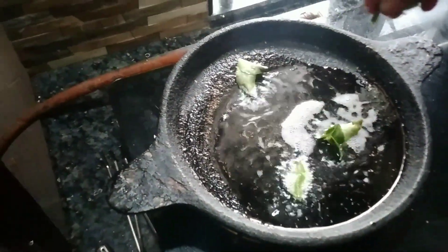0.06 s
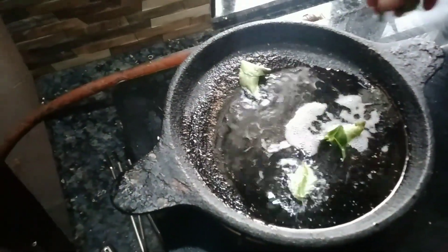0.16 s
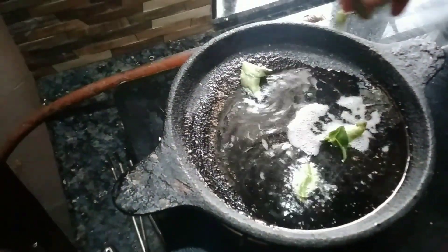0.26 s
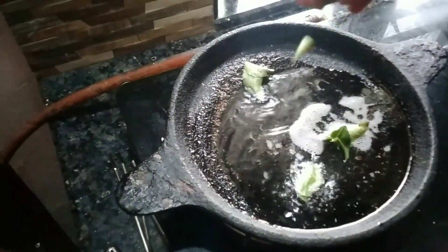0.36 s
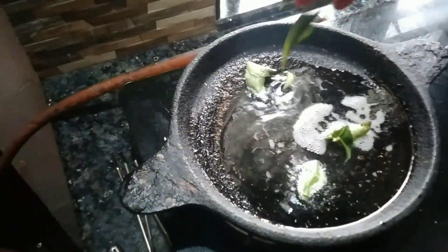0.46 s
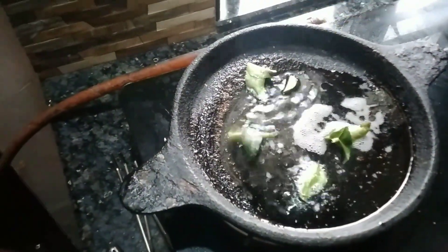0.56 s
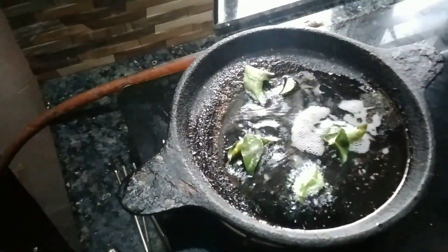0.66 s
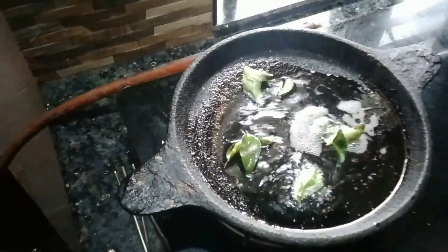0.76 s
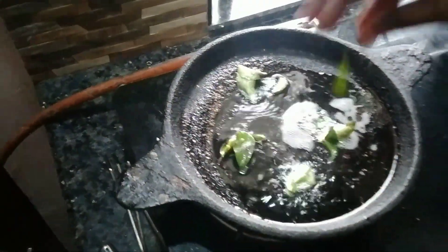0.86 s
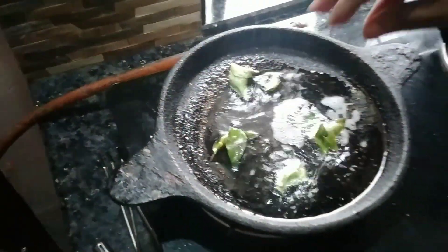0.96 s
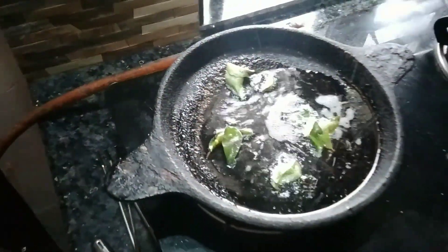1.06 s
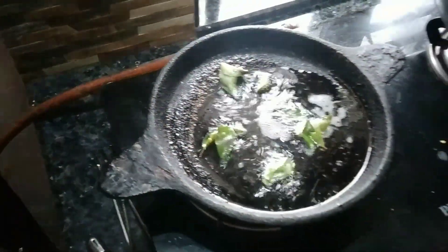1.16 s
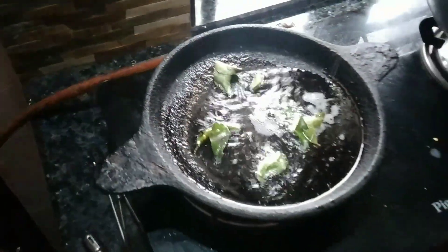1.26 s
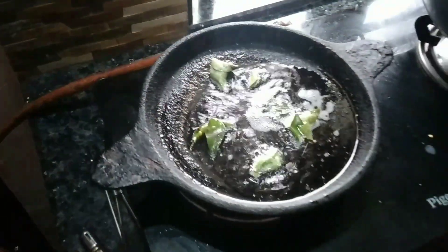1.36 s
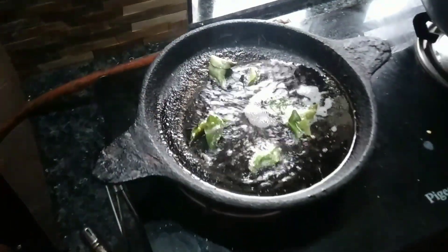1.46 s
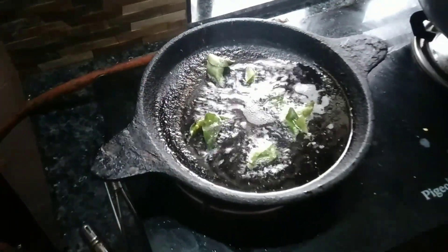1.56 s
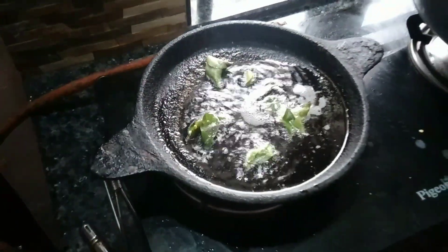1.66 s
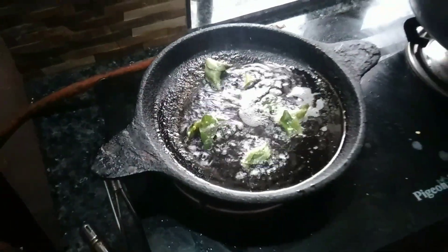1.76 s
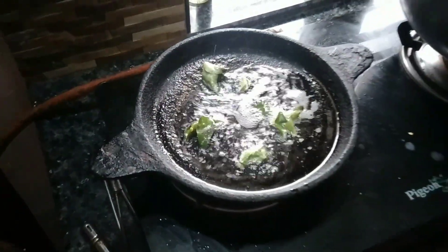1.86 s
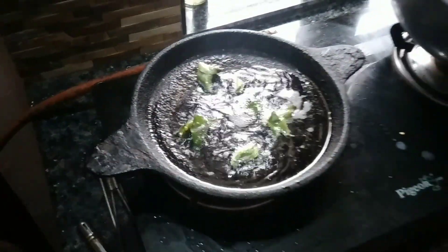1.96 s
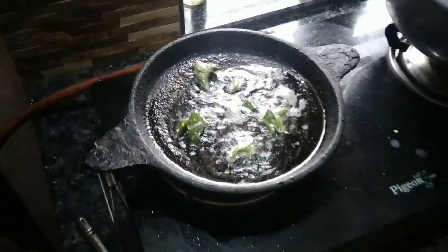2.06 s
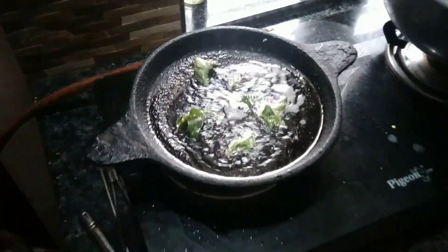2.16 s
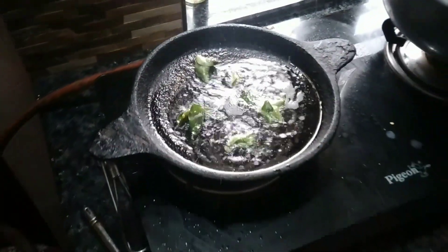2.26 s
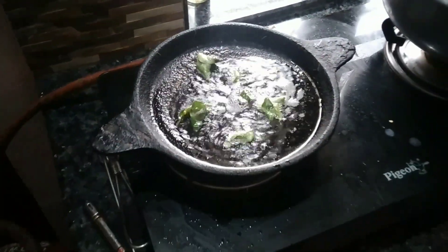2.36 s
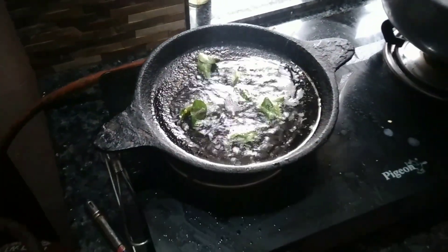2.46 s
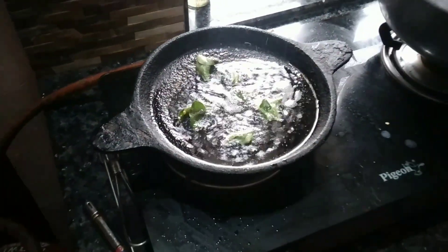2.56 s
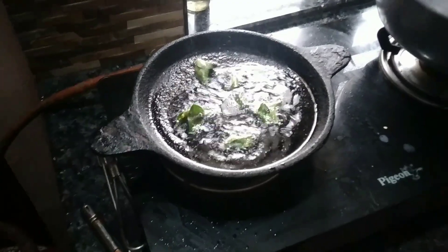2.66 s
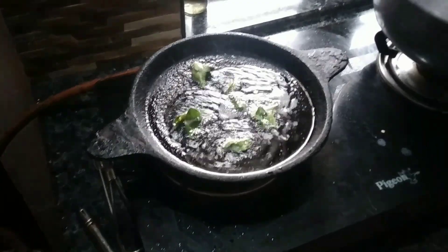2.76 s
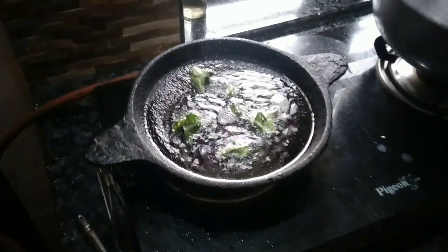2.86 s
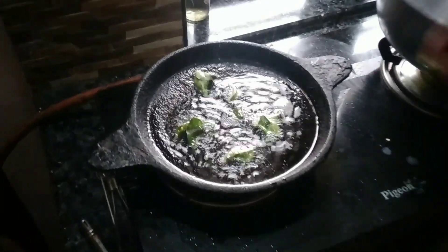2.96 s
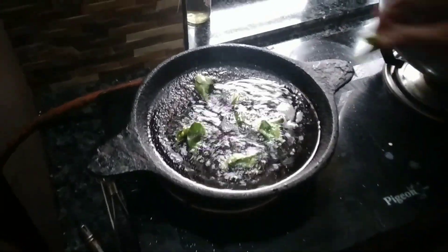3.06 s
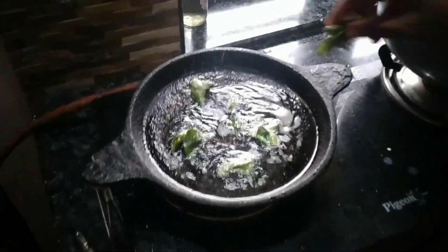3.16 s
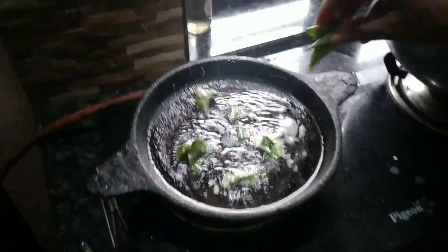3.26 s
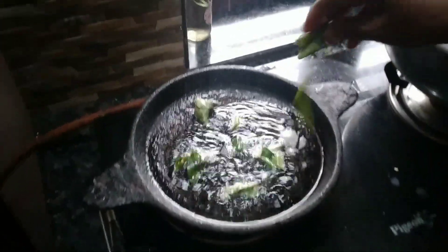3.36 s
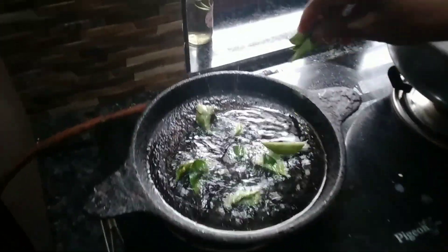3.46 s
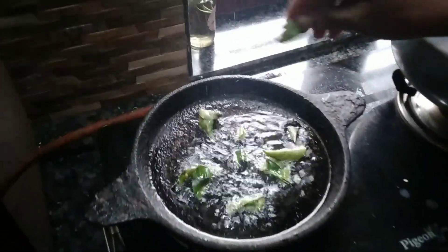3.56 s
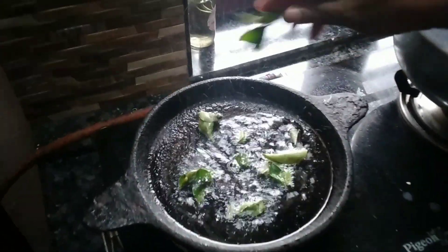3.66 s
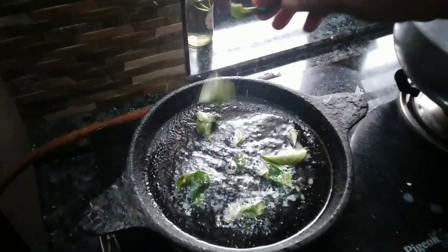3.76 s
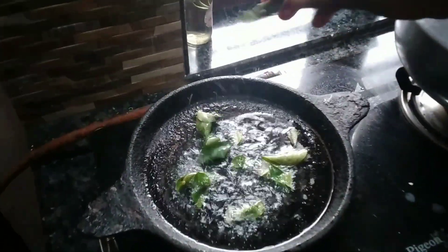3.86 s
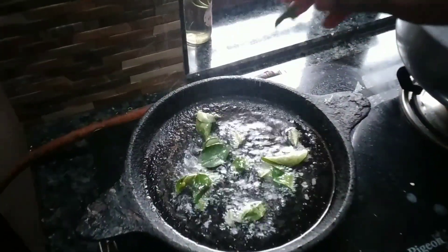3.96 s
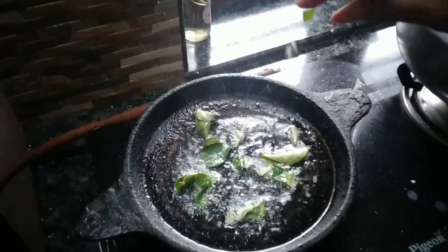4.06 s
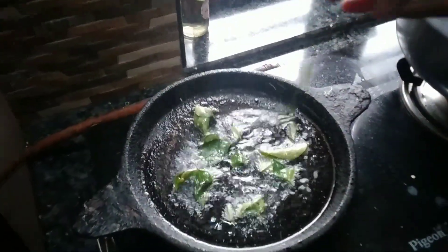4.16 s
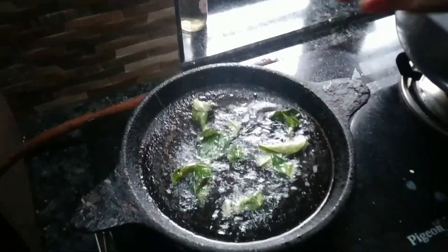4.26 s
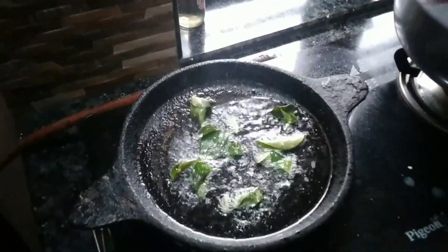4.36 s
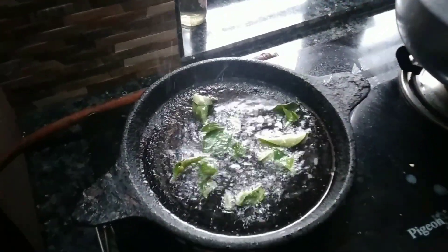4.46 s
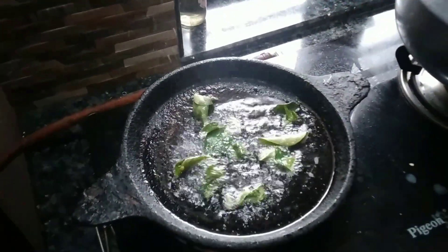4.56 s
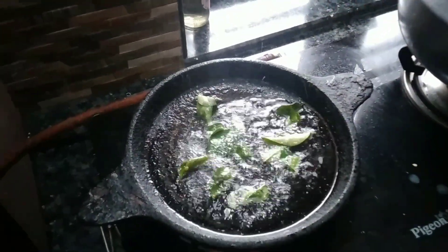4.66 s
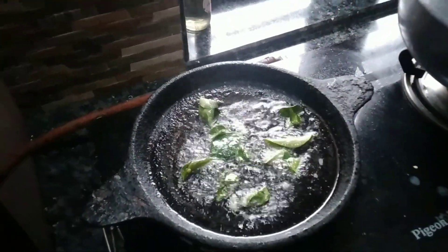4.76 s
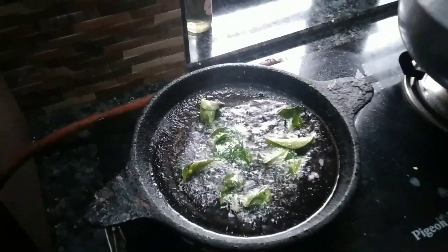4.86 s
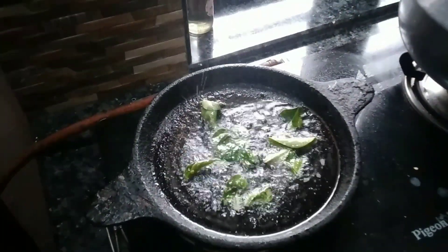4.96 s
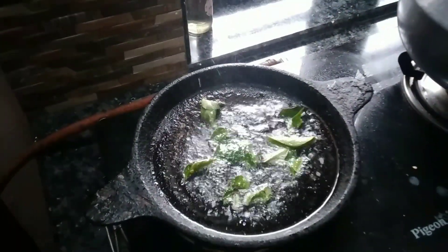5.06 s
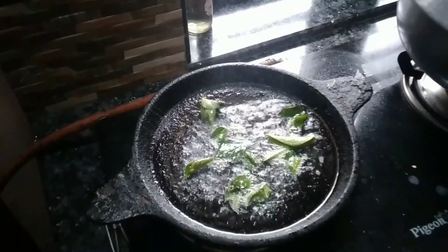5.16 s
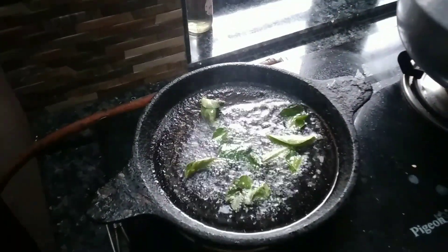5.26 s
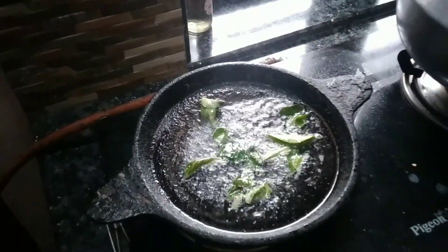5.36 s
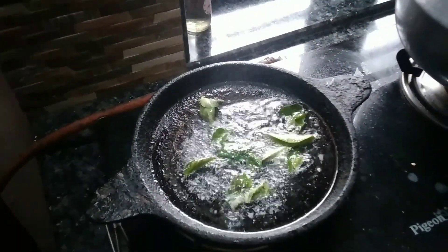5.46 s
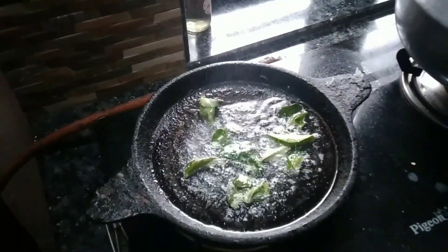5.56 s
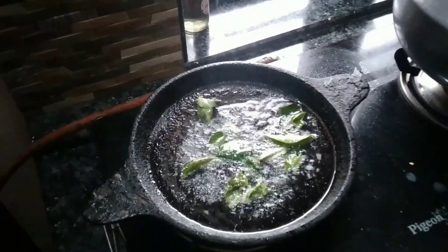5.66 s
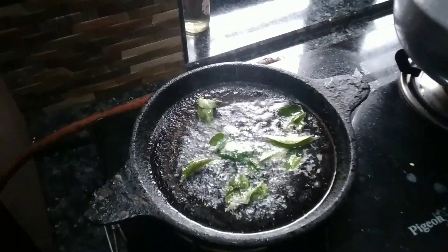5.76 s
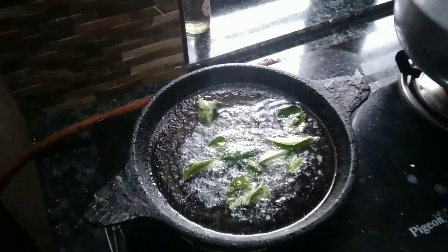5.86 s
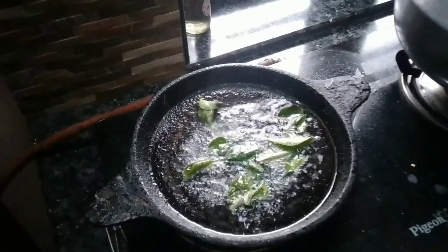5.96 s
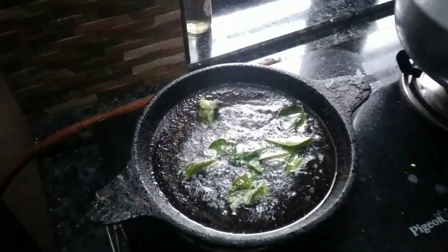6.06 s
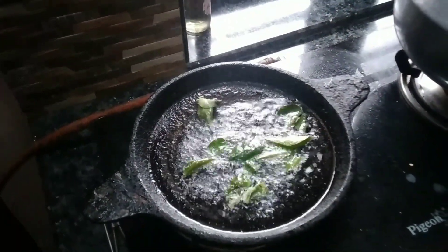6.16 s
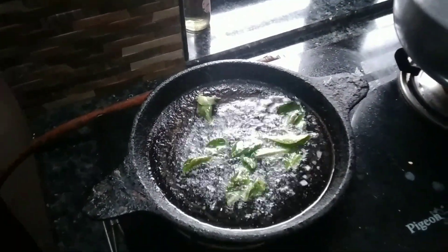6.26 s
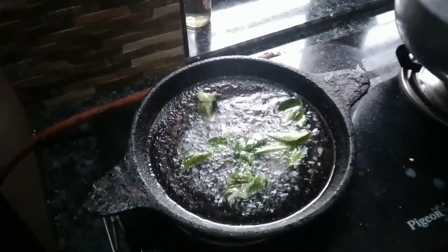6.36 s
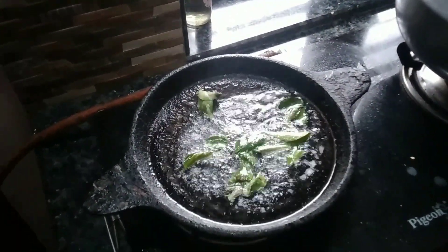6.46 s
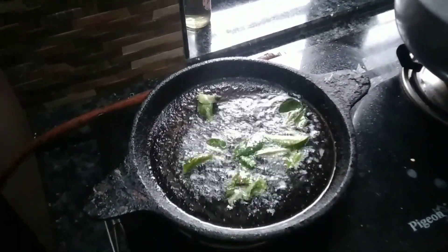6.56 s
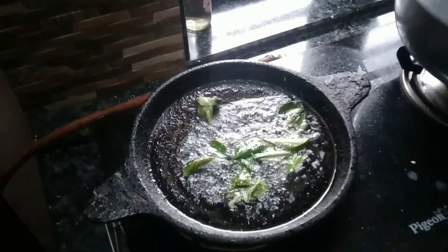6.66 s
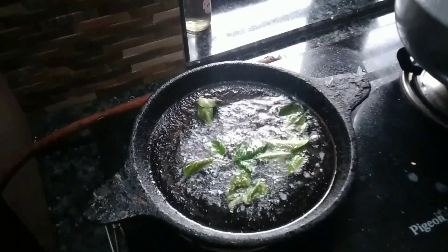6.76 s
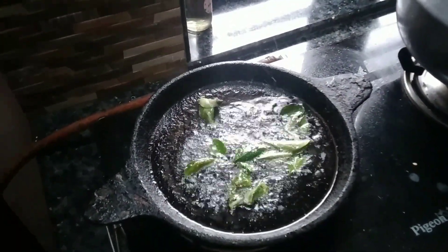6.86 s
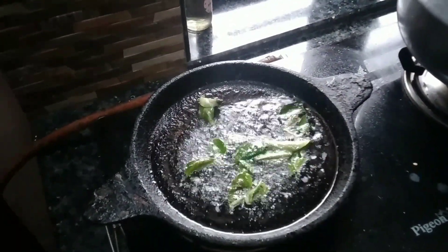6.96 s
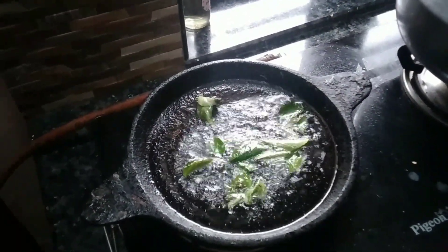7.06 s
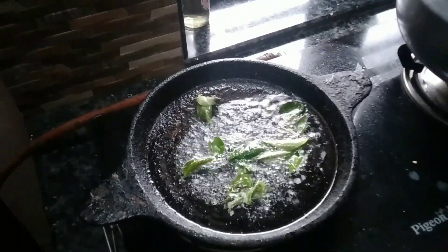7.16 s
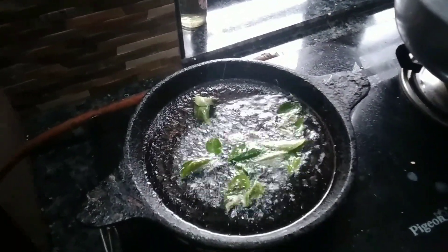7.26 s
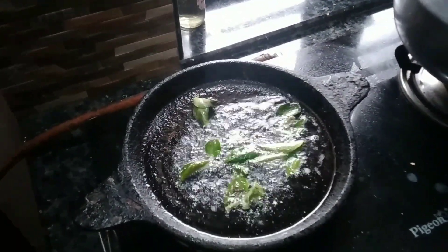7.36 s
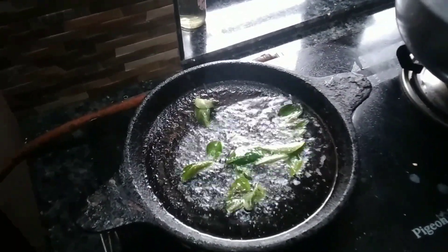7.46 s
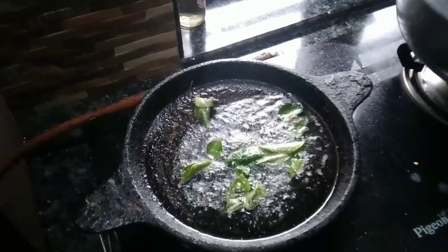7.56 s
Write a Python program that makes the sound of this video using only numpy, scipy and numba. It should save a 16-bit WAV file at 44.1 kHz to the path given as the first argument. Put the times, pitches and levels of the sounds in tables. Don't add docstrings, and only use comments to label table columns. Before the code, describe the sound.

Wet leaves fry in an iron pan of hot oil, close to a stereo microphone in a small, slightly echoing kitchen. From 0 to 0.5 s the fizz is thin, with quick sharp spits over faint low room noise. A cluster of hollow pops comes at 0.5-0.7 s, then the sizzle rises in clumps from about 0.9 s. Soft dull knocks begin near 1.5 s and recur at 2.4 and 3.6 s. From 3 s the frying thickens; strong pops at 3.6-3.7 s ring the pan, and by 4.3 s it is a dense, bright, bubbling splutter. At 5.1 s one hard spit cracks and overloads the left side, followed by muffled knocks around 5.4-5.6 s. The sizzle eases slightly after 6 s, a louder thud lands near 6.8 s, sharp spits return after 7.1 s, and frying continues to the end at about 7.6 s.

```python
import sys
import numpy as np
from scipy import signal
from scipy.fft import rfft, irfft
from scipy.io import wavfile
from scipy.ndimage import uniform_filter1d
from numba import njit

SR = 44100
rng = np.random.default_rng(int(sys.argv[2]) if len(sys.argv) > 2 else 0)


def gain_from_db(level_db):
    decades = np.asarray(level_db, float) / 20
    return 10 ** decades


def persist_wave(psi):
    counts = np.round(np.clip(psi, -1, 1) * 32767).astype(np.int16)
    wavfile.write(sys.argv[1], SR, np.atleast_2d(counts).T)


N = 336483

# (time [s], room rumble [dB], draught on the left port [dB])
AIR_LEVELS = [(0.0, -58.5, -64), (0.81, -57.5, -66), (1.44, -54, -55), (2.91, -54, -60), (3.27, -50.5, -68),
              (3.76, -49, -61), (4.36, -53, -54), (4.72, -54, -62.5), (5.8, -55.5, -53), (6.2, -55, -61),
              (7.63, -54.5, -58)]
# (frequency [Hz], level [dB per Hz])
RUMBLE_COLOUR = [(12, -31), (20, 4), (103, -3.5), (151, 0), (231, -3), (286, -8.5), (359, -5.5), (600, -10),
                 (780, -30), (1320, -120)]
# (time [s], peak [dB], time to die by 60 dB [s])
KNOCKS = [
    (1.529, -40, 0.32),
    (1.629, -47.5, 0.44),
    (2.429, -38, 0.27),
    (3.599, -37, 0.39),
    (5.378, -35, 0.84),
    (5.639, -39.5, 0.38),
    (6.843, -25, 0.64),
    (7.021, -38.5, 0.51),
]
# (frequency [Hz], level [dB], width [Hz])
ROOM_MODES = [(130, -6.5, 14), (246, 1, 7.3), (324, -12, 55), (368, 1, 14), (475, -4, 23), (745, -1.5, 73),
              (890, -14, 120)]
# (frequency [Hz], time to die by 60 dB [s])
ECHO_TIMES = [(200, 0.19), (1000, 0.46), (4000, 0.36), (12000, .12)]
# (frequency [Hz], width [Hz], few leaves [dB], many leaves [dB])
PAN_MODES = [(893, 24, -16, -14), (1025, 24, -19, -8), (1106, 32, -12, -6.5), (1388, 18, -1, 1.5),
             (1628, 14.5, -3, 0), (1830, 18, -0.5, -10), (1876, 17, -4.5, 0), (1928, 11.5, -15, -2.5),
             (2637, 23, 3, 3), (3800, 59, -3, -3)]
# (time [s], peak [dB], pitch [Hz], crack above 8 kHz [dB])
SPITS = [(0.024, -16, 4220, -56), (0.0316, -10, 5470, -46), (0.0522, -20, 4090, -56),
         (0.1294, -23, 5670, -47), (0.1393, -21, 3870, -55), (0.154, -14, 6180, -42),
         (0.1831, -22, 5920, -51), (0.1902, -13, 6280, -48), (0.2071, -22, 5480, -53),
         (0.2471, -21, 6380, -52), (0.2883, -18, 4720, -46), (0.3223, -10, 6310, -46),
         (0.3899, -22, 6620, -47), (0.4345, -10, 5910, -44), (0.7272, -21, 6620, -41),
         (0.7513, -15, 6160, -36), (0.7591, -20, 6280, -46), (0.7784, -18, 5020, -49),
         (0.8285, -17, 6200, -42), (0.8654, -13, 6160, -38), (0.8754, -11, 5600, -40),
         (0.8887, -15, 6440, -40), (0.9363, -18, 5570, -43), (0.9423, -18, 5370, -44),
         (0.9512, -18, 6150, -44), (1.0141, -19, 5850, -42), (1.0415, -10, 6230, -31),
         (1.056, -17, 6160, -38), (1.2106, -18, 5750, -37), (1.2365, -17, 5780, -38),
         (1.2968, -18, 5880, -45), (1.392, -16, 4770, -40), (1.4649, -12, 3960, -42),
         (1.4788, -16, 4600, -43), (1.6227, -12, 6440, -29), (1.6312, -14, 4820, -35),
         (1.6737, -12, 5820, -38), (1.752, -13, 4560, -42), (1.9259, -11, 6070, -26),
         (1.9344, -12, 6050, -32), (2.0562, -16, 6090, -45), (2.0964, -14, 6270, -33),
         (2.2142, -13, 4550, -40), (2.3284, -12, 5340, -35), (2.3772, -14, 5900, -41),
         (2.5737, -16, 6270, -38), (2.5945, -16, 5480, -32), (2.64, -15, 4700, -38),
         (2.6641, -15, 4570, -42), (2.6772, -11, 5610, -28), (2.952, -13, 5100, -40),
         (2.9627, -10, 4140, -43), (3.0774, -15, 4330, -38), (3.2344, -13, 4300, -44),
         (3.3273, -14, 5580, -39), (3.3643, -13, 5210, -40), (3.3959, -12, 4450, -40),
         (3.4036, -11, 4780, -28), (3.4593, -12, 6020, -39), (3.5706, -12, 5110, -37),
         (3.5854, -12, 5440, -34), (3.717, -13, 5670, -36), (3.76, -11, 5870, -38),
         (3.8743, -13, 5270, -40), (3.9386, -13, 6320, -40), (3.9787, -10, 6090, -31),
         (3.9907, -10, 5200, -40), (4.1183, -9, 5000, -29), (4.2631, -10, 5150, -40),
         (4.2809, -12, 6490, -38), (4.2918, -12, 6030, -32), (4.3609, -12, 5980, -38),
         (5.1267, -7, 4710, -23), (5.1868, -12, 4440, -41), (5.5703, -9, 5810, -37),
         (5.6524, -13, 5130, -22), (5.6658, -13, 4960, -36), (5.9869, -11, 4110, -39),
         (6.7415, -11, 4860, -38), (7.104, -13, 4760, -32), (7.143, -9, 5920, -41),
         (7.1483, -12, 5910, -40), (7.3495, -13, 4900, -46), (7.4023, -12, 5650, -41),
         (7.4369, -11, 6190, -26)]
# (time [s], peak [dB], pitch [Hz], length [ms])
POPS = [(0.0055, -20, 1770, 3.3), (0.017, -18, 950, 2.3), (0.0514, -20, 2590, 1.8),
        (0.1145, -23, 1940, 1.1), (0.1896, -22, 1920, 1.3), (0.2221, -23, 1050, 1.7),
        (0.2857, -21, 2230, 3.2), (0.4341, -25, 1860, 1.0), (0.5037, -21, 1530, 1.1),
        (0.5417, -14, 2380, 3.4), (0.5914, -15, 1460, 1.8), (0.6193, -11, 1710, 4.4),
        (0.6301, -17, 1350, 3.4), (0.6891, -20, 1880, 1.0), (0.7511, -19, 1650, 1.1),
        (0.877, -21, 1350, 1.7), (0.8877, -18, 1940, 1.9), (0.9215, -19, 1100, 1.5),
        (0.932, -19, 2640, 3.0), (0.9635, -18, 1050, 2.0), (0.9715, -18, 900, 1.6), (1.0, -17, 2540, 2.5),
        (1.0411, -9, 1710, 1.1), (1.0509, -17, 2430, 3.4), (1.1365, -16, 1820, 1.2),
        (1.3454, -17, 1900, 1.6), (1.4646, -14, 2180, 1.1), (1.4764, -17, 2280, 1.8),
        (1.5351, -16, 1740, 1.1), (1.5804, -14, 1470, 1.8), (1.6223, -15, 1550, 1.2),
        (1.6943, -16, 1940, 2.4), (1.7204, -15, 1830, 4.3), (1.7517, -14, 1630, 1.2),
        (1.8075, -9, 1800, 4.3), (1.8181, -13, 1590, 1.9), (1.9344, -13, 1700, 1.1),
        (1.9458, -13, 2050, 2.0), (2.1146, -17, 1560, 1.2), (2.302, -14, 1890, 2.9),
        (2.4377, -11, 2180, 1.9), (2.4605, -15, 2480, 2.8), (2.5942, -16, 1700, 1.2),
        (2.8713, -17, 1780, 1.1), (2.8819, -14, 2290, 1.5), (2.9537, -11, 2370, 1.7),
        (3.0794, -13, 1590, 1.5), (3.2219, -14, 1960, 2.5), (3.5058, -14, 2230, 3.2),
        (3.5381, -15, 1840, 1.5), (3.6284, -5, 1730, 4.8), (3.6392, -11, 1520, 1.9),
        (3.6945, -14, 1400, 3.0), (3.7133, -8, 1920, 5.1), (3.899, -11, 1160, 2.3),
        (3.9555, -11, 1520, 1.1), (4.0114, -14, 1990, 1.5), (4.1177, -14, 1530, 1.2),
        (4.2187, -12, 1880, 1.3), (4.2259, -13, 2010, 2.8), (4.2335, -14, 1600, 2.5),
        (4.3178, -9, 1500, 3.5), (4.3232, -10, 1760, 2.2), (4.3359, -8, 1110, 2.1), (4.352, -12, 1900, 3.0),
        (4.3796, -12, 1830, 3.1), (4.5301, -11, 2110, 1.3), (4.5428, -15, 2330, 1.4),
        (4.6246, -11, 2780, 2.4), (4.7362, -9, 2350, 1.3), (4.7589, -11, 1620, 1.2),
        (4.813, -13, 1850, 1.2), (4.8411, -10, 1350, 1.4), (4.9038, -12, 2050, 1.8),
        (5.0205, -13, 2490, 3.9), (5.1262, -8, 2190, 1.5), (5.3903, -10, 1290, 1.4),
        (5.5539, -14, 1800, 3.4), (5.7209, -15, 2130, 1.2), (5.8765, -14, 1830, 1.2),
        (5.9283, -15, 1820, 3.4), (6.0693, -13, 1460, 1.3), (6.0998, -13, 2010, 3.0),
        (6.1296, -13, 2320, 3.1), (6.2409, -12, 2470, 3.9), (6.3055, -15, 2910, 4.1),
        (6.3458, -16, 2960, 3.0), (6.4165, -16, 1900, 1.3), (6.4432, -15, 2770, 1.6),
        (6.4855, -15, 2220, 1.2), (6.5456, -14, 1830, 4.1), (6.7412, -15, 1650, 1.1),
        (7.0426, -13, 1730, 1.1), (7.3339, -15, 1580, 1.8)]
# (time [s], large bubbles [dB], fine fizz [dB], spray [dB])
FRYING = [(0.0, -38, -37.5, -55.5), (0.32, -41.5, -41, -61), (0.51, -40, -38, -55), (0.74, -37.5, -36, -49),
          (0.93, -30, -34, -51.5), (1.06, -33, -34, -48), (1.42, -31.5, -31, -46.5),
          (1.74, -29.5, -32, -43.5), (2.0, -31, -31, -46), (2.17, -29.5, -29, -43.5),
          (2.44, -31.5, -31, -45.5), (2.74, -30, -30, -45), (3.16, -27.5, -29, -47),
          (3.76, -25.5, -26, -43), (4.14, -26, -26.5, -41.5), (4.72, -27, -26.5, -42),
          (4.97, -26, -27, -40.5), (5.16, -26, -23.5, -44), (5.82, -28, -26, -43.5), (6.2, -27, -28.5, -43),
          (6.5, -29, -27, -44), (6.71, -29.5, -27, -45), (7.03, -25, -26.5, -45), (7.33, -29, -27, -46),
          (7.63, -31, -27, -45.5)]
# (frequency [Hz], level [dB per Hz])
SIZZLE_COLOUR = [(150, -46), (250, -25), (588, -14), (1060, -6.5), (1210, -7.5), (1360, -5), (1470, -8),
                 (1920, -1.5), (2120, -3.5), (2570, 1.5), (3210, -9.5), (4310, -5.5), (6610, -8),
                 (8500, -28.5), (11000, -57), (18700, -120)]
# (frequency [Hz], level [dB per Hz])
SPRAY_COLOUR = [(4120, -18), (7000, 3.5), (7840, -12.5), (8610, -17.5), (10700, -15.5), (12400, -24.5),
                (15600, -28)]
# (frequency [Hz], left minus right [dB])
PORT_TILT = [(60, 1.5), (92, -0.5), (140, -0.5), (210, 4), (330, -2.5), (500, 3), (770, -0.5), (1170, -0.5),
             (1790, 3.5), (2740, -1), (4190, 8), (6410, 20.5), (9810, -12.5), (15000, -7)]
# (time [s], level [dB], recovery [s])
JOLT = (5.1265, -12, 0.03)


def evened(x):
    return x / np.sqrt(np.mean(x ** 2) + 1e-20)


def read(points, hz):
    f, value = np.transpose(points)
    return np.interp(np.log(hz + 1), np.log(f + 1), value)


def curve(table, column):
    rows = np.array(table)
    return np.interp(np.arange(N) / SR, rows[:, 0], rows[:, column])


def drift(hz):
    span = max(int(SR / hz / 2), 1)
    smooth = uniform_filter1d(uniform_filter1d(rng.standard_normal(N), span), span)
    return evened(smooth - uniform_filter1d(smooth, int(span * 4.5)))


def coloured(x, points, lo_hz, hi_hz):
    z, hz = rfft(x), np.fft.rfftfreq(N, 1 / SR)
    own = np.sqrt(uniform_filter1d((abs(z) ** 2).mean(0), size=3000)) + 1e-9
    edges = 1 / np.sqrt((1 + (lo_hz / (hz + 1)) ** 12) * (1 + (hz / hi_hz) ** 12))
    return evened(irfft(z / own * gain_from_db(read(points, hz)) * edges, N))


def room_modes(x):
    hz = np.fft.rfftfreq(N, 1 / SR)
    response = sum(gain_from_db(db) / (1 + 2j * (hz - f) / width) for f, db, width in ROOM_MODES)
    return irfft(rfft(x) * response, N)


def rumble():
    noise = rng.standard_normal(N) + 0.45 * rng.standard_normal((2, N))
    room = coloured(noise, RUMBLE_COLOUR, 69.0, 480.0)
    room = room + gain_from_db(3.0) * room_modes(room)
    draught = coloured(noise, RUMBLE_COLOUR, 18.0, 55.0) * gain_from_db([[1.5], [-2.5]])
    return gain_from_db(curve(AIR_LEVELS, 1) - 0.5) * room + gain_from_db(curve(AIR_LEVELS, 2) + 1.0) * draught


def knocks():
    t = np.arange(N) / SR
    drive = np.zeros(N)
    for s, db, t60 in KNOCKS:
        drive += gain_from_db(db - 60 * np.maximum(t - s, 0) / t60) * (t > s)
    noise = rng.standard_normal(N) + 0.23 * rng.standard_normal((2, N))
    return gain_from_db(18.0) * room_modes(drive * noise)


def kitchen(x):
    taps = np.zeros((6, SR // 2))
    at = np.arange(120, SR // 2 - 20, 20) + rng.integers(0, 20, (6, (SR // 2 - 121) // 20))
    np.put_along_axis(taps, at, rng.choice([-1.0, 1.0], at.shape), 1)
    hz, t, z = signal.stft(taps, SR, nperseg=256)
    fade = gain_from_db(-60 * t / read(ECHO_TIMES, hz)[:, None])
    tail = signal.istft(z * fade, SR, nperseg=256)[1]
    tail = tail.reshape(3, 2, -1) / np.linalg.norm(tail[0])
    turn = 2 * np.pi * (np.arange(N) / SR * 5.5 + np.arange(3)[:, None, None] / 3)
    parts = x * np.sqrt(2 / 3) * np.cos(turn)
    return signal.fftconvolve(parts, tail, axes=2).sum(0)[:, :N]


def pan_ring(x):
    hz = np.fft.rfftfreq(N, 1 / SR)
    load = np.interp(np.arange(N) / SR, [0.8, 4.5], [0, 1])
    few, many = rfft(x.mean(0) * (1 - load)), rfft(x.mean(0) * load)
    out = np.zeros((2, len(hz)), complex)
    for f, width, few_db, many_db in PAN_MODES:
        mode = (gain_from_db(few_db) * few + gain_from_db(many_db) * many) / (1 + 2j * (hz - f) / width)
        phase = rng.choice([-1.0, 1.0]) * rng.uniform(0.55, 0.62)
        out += mode * np.exp(1j * phase * np.array([[1], [-1]]))
    return irfft(out, N)


@njit
def bursts(s, left, right, hz, tau, rise, glide, lag):
    out = np.zeros((2, N + 8192))
    for k in range(len(s)):
        start = int(s[k] * SR)
        length = min(int((6 * tau[k] + abs(lag[k])) * SR) + 2, 8000)
        for i in range(length):
            for c in range(2):
                t = (start + i) / SR - s[k] - max(lag[k] * (1 - 2 * c), 0.0)
                if t > 0:
                    fade = np.exp(-t / tau[k])
                    cycles = hz[k] * (t + glide * tau[k] * (t / tau[k] - 1 + fade))
                    shape = (1 - np.exp(-t / (rise * tau[k]))) * fade
                    size = left[k] if c == 0 else right[k]
                    out[c, start + i] += size * shape * np.sin(2 * np.pi * cycles)
    return out[:, :N]


def spits():
    s, db, hz, crack_db = np.transpose(SPITS)
    u = rng.random((len(s), 3)).T
    lag = 0.00012 * (u[0] - 0.2)
    body, crack, tick = -gain_from_db(db + 11.0), gain_from_db(crack_db + 9.5), -gain_from_db(db - 2.0)
    crack_hz = 10500.0 * (0.88 + 0.26 * u[1])
    tick_hz = 1530.0 * (0.52 + 1.2 * u[2])
    return (bursts(s - 0.0001, body, body, hz, 2.9 / hz, 0.66, 0.031, lag)
            + bursts(s - 0.0001, crack, crack, crack_hz, 6.3 / crack_hz, 0.22, 0.04, lag)
            + bursts(s - 0.0001, tick, tick, tick_hz, 0.8 / tick_hz, 0.64, 0.04, lag))


def pops():
    s, db, hz, length_ms = np.transpose(POPS)
    side = gain_from_db(-1.1 + 0.61 * rng.standard_normal(len(s)))
    left, right = -gain_from_db(db + 4.0) * side, -gain_from_db(db + 4.0) / side
    lag = np.full(len(s), 0.00006)
    tau = np.maximum(length_ms, 0.3) * 0.00069
    note = bursts(s - 0.0002, left, right, hz * 0.85, tau, 0.36, 0.286, lag)
    suck_hz, suck_tau = 363.0 + hz * 0.22, np.minimum(tau, 0.0009)
    suck = bursts(s - 0.0002, left, right, suck_hz, suck_tau, 0.86, 0.36, lag)
    return note + gain_from_db(-7.0) * suck


def boiling(busy, slow_db, quick_db):
    clumps = gain_from_db((slow_db + quick_db) / busy ** 0.3)
    return busy * clumps / clumps.mean()


def splutter(events, level_db, over_db, fade_s):
    s, db = np.transpose(events)[:2]
    at = (s * SR).astype(int)
    kicks = np.zeros(N)
    kicks[at] = np.minimum(gain_from_db(2 * (db - level_db[at] - over_db)), 5.5)
    return signal.lfilter([1], [1, -np.exp(-1 / (fade_s * SR))], kicks)


def swarm(clumps, per_s, spread_db, lo_hz, hi_hz, turns, pan_db, lag_s):
    s = np.flatnonzero(rng.random(N) < per_s / SR * clumps) / SR
    u = rng.random((5, len(s)))
    size = gain_from_db(spread_db * np.minimum(-np.log(1 - u[0]), 4.2))
    hz = lo_hz * (hi_hz / lo_hz) ** u[1]
    side = gain_from_db(pan_db * (u[2] - 0.5))
    tau = turns * (0.31 + 0.92 * u[3]) / hz
    return bursts(s, size * side, size / side, hz, tau, 0.29, 0.11, lag_s * (u[4] - 0.27))


def large_bubbles(busy, slow, quick):
    clumps = boiling(busy, 1.8 * slow, 3.5 * quick)
    clumps = clumps + busy * splutter(POPS, curve(FRYING, 1), over_db=15.0, fade_s=0.03)
    x = swarm(clumps, 1800.0, spread_db=3.5, lo_hz=343.0, hi_hz=3600.0, turns=0.86, pan_db=6.0, lag_s=0.00028)
    return gain_from_db(curve(FRYING, 1) - 1.5) * coloured(x / busy ** 0.5, SIZZLE_COLOUR, 220.0, 2245.0)


def fine_fizz(busy, slow, quick):
    clumps = boiling(busy, 1.3 * slow + 1.1 * drift(14.0), 2.5 * quick + 2.5 * drift(70.0))
    clumps = clumps + busy * splutter(SPITS, curve(FRYING, 2), over_db=21.0, fade_s=0.018)
    x = swarm(clumps, 4000.0, spread_db=4.0, lo_hz=2550.0, hi_hz=9160.0, turns=2.1, pan_db=4.5, lag_s=0.00017)
    return gain_from_db(curve(FRYING, 2) + 2.5) * coloured(x / busy ** 0.5, SIZZLE_COLOUR, 3089.0, 11300.0)


def fine_spray(busy, slow, quick):
    clumps = boiling(busy ** 0.4, 0.87 * slow + 1.4 * drift(14.0), 2.1 * quick + 2.2 * drift(70.0))
    x = swarm(clumps, 9000.0, spread_db=4.0, lo_hz=6630.0, hi_hz=16600.0, turns=1.26, pan_db=10.0, lag_s=0.0002)
    return gain_from_db(curve(FRYING, 3) + 8.0) * coloured(x / busy ** 0.2, SPRAY_COLOUR, 7730.0, 14960.0)


def sizzle():
    busy = gain_from_db(1.2 * (uniform_filter1d(curve(FRYING, 2), size=SR // 3) + 28.0))
    slow, quick = drift(14.0), drift(60.0)
    large = large_bubbles(busy, slow, quick)
    return large, fine_fizz(busy, slow, quick) + fine_spray(busy, slow, quick)


def scene():
    large, fine = sizzle()
    low = large + pops()
    oil = low + fine + spits()
    ring = gain_from_db(2.5) * pan_ring(low + gain_from_db(-3.5) * oil)
    pan = oil + ring
    return pan + gain_from_db(-8.5) * kitchen(pan) + knocks() + rumble()


def low_pass(x):
    return signal.sosfilt(signal.butter(12, 15720, fs=SR, output="sos"), x)


def record(dry):
    hz = np.fft.rfftfreq(N, 1 / SR)
    tilt_db = read(PORT_TILT, hz)
    ports = gain_from_db([tilt_db / 2, -tilt_db / 2])
    ports = ports / np.sqrt((ports ** 2).mean(0))
    x = irfft(rfft(dry) * ports * (hz < 15700), N)
    s, db, recovery = JOLT
    t = np.maximum(np.arange(N) / SR - s, 0)
    x[0] -= gain_from_db(db) * (1 - np.exp(-t / 0.00024)) * np.exp(-t / recovery)
    mix = np.clip(x, -1, 1)
    return low_pass(mix)


dry = scene()
out = record(dry)
persist_wave(out)
```